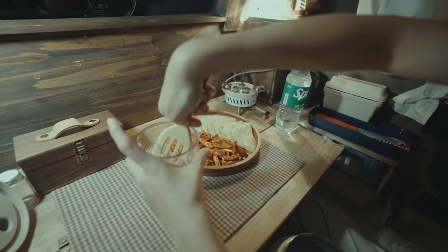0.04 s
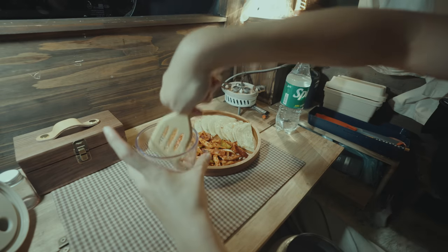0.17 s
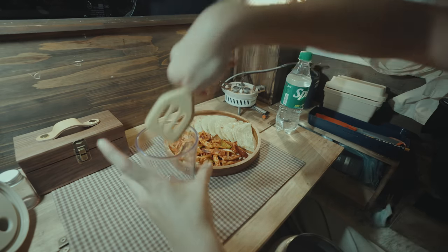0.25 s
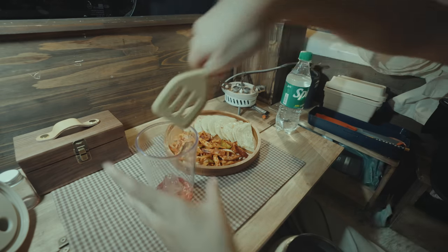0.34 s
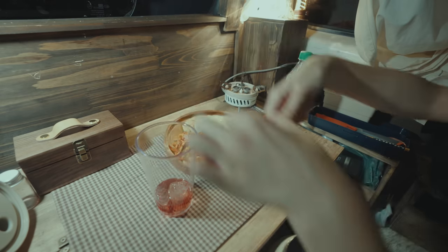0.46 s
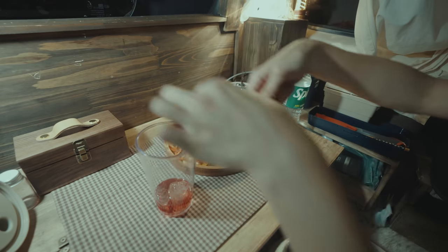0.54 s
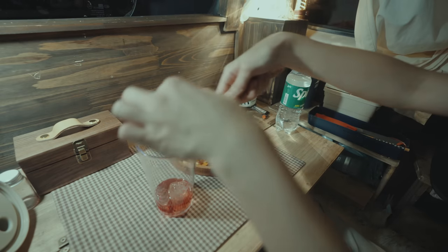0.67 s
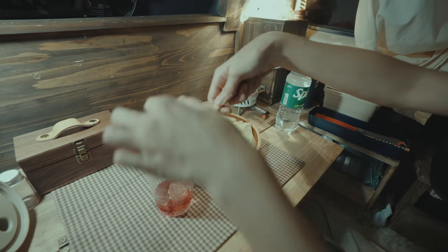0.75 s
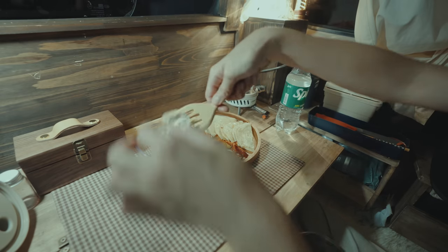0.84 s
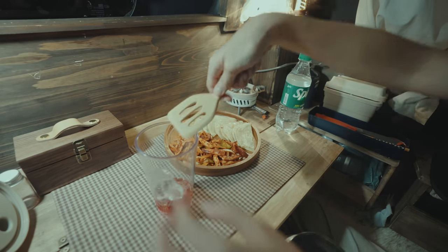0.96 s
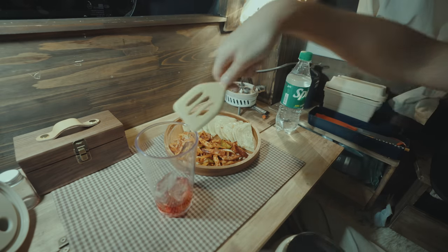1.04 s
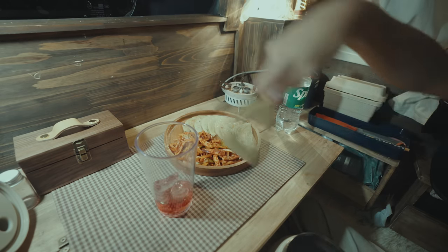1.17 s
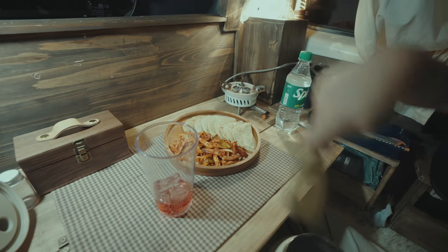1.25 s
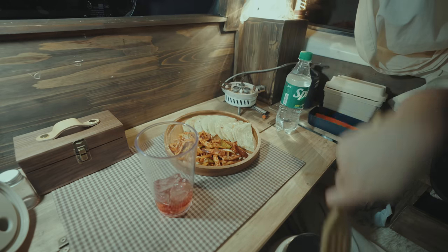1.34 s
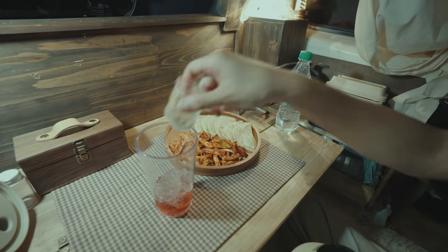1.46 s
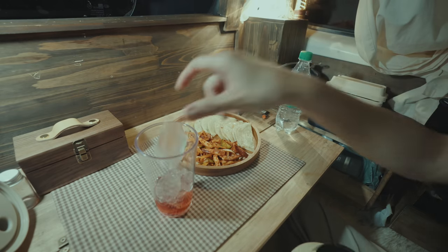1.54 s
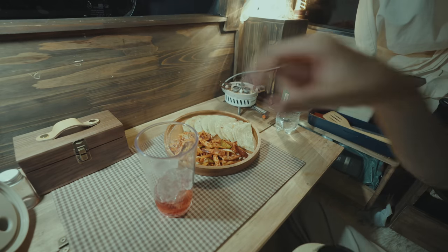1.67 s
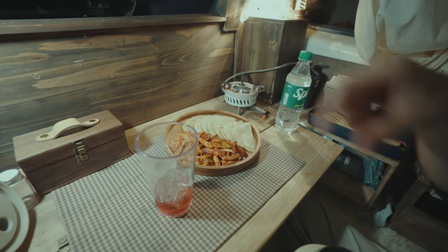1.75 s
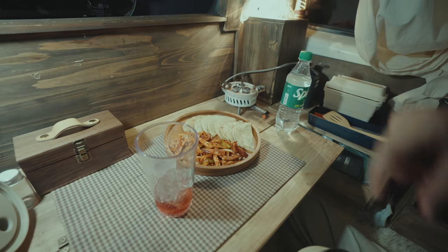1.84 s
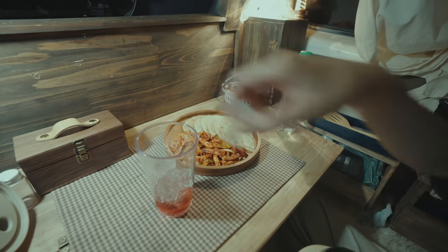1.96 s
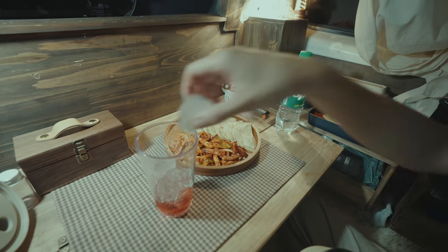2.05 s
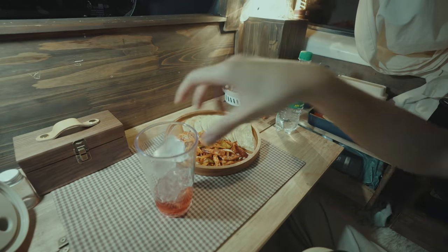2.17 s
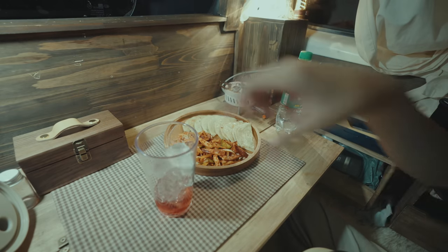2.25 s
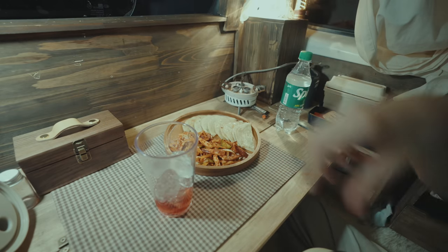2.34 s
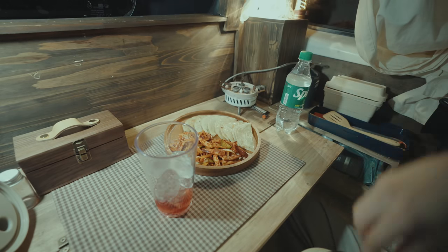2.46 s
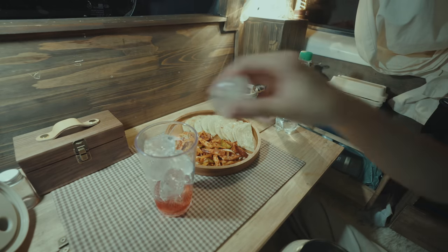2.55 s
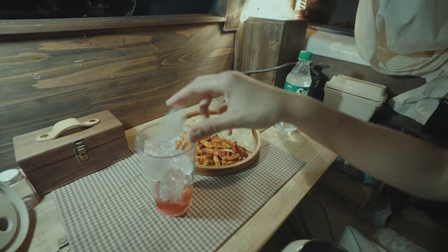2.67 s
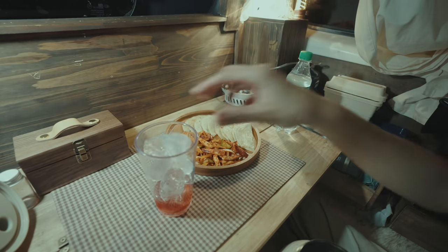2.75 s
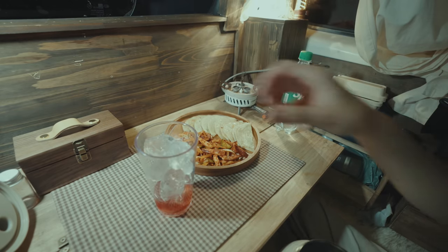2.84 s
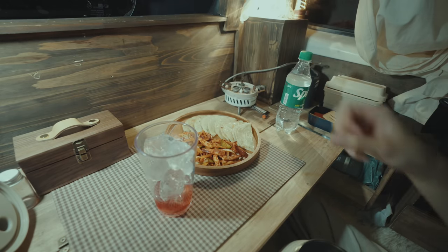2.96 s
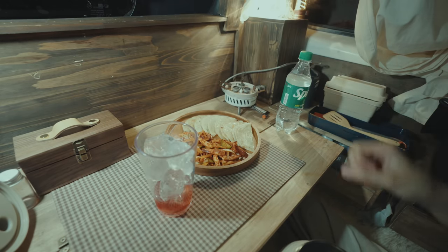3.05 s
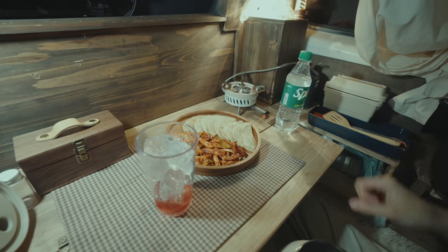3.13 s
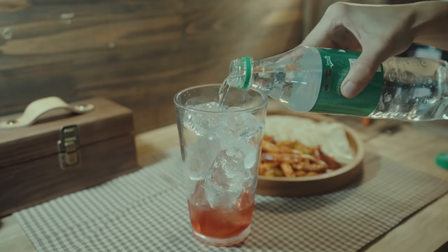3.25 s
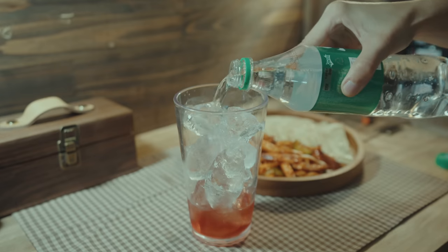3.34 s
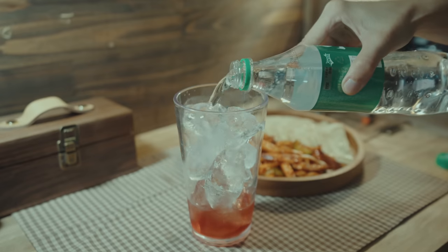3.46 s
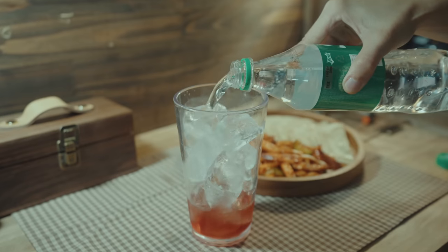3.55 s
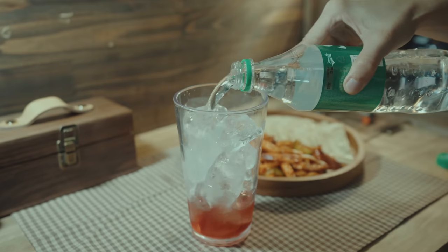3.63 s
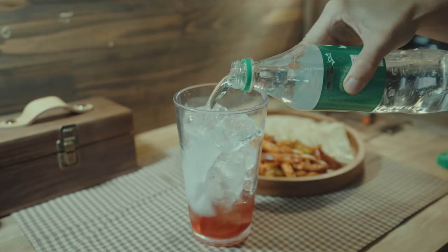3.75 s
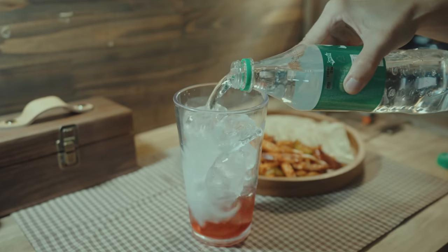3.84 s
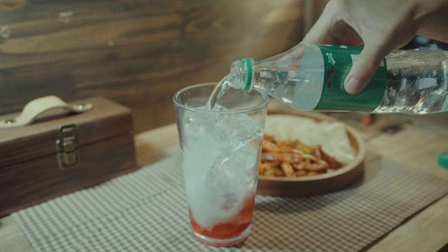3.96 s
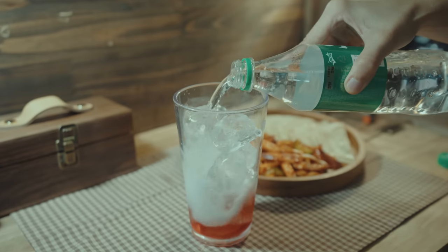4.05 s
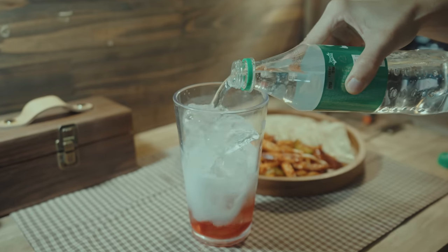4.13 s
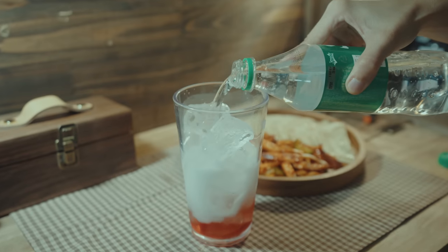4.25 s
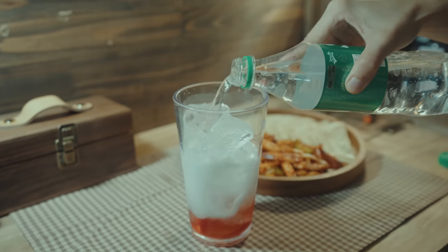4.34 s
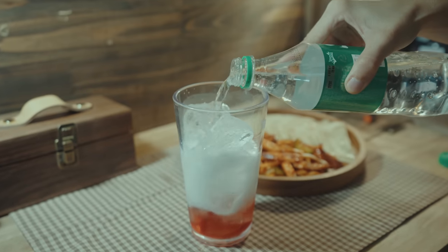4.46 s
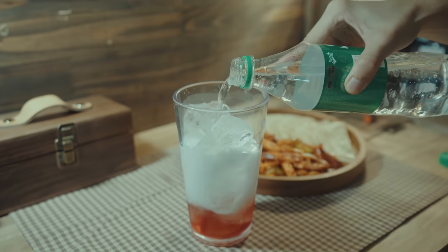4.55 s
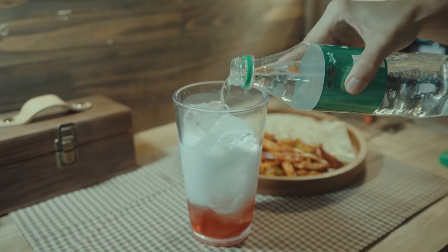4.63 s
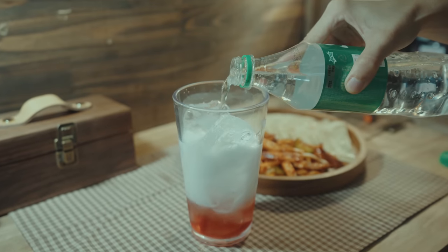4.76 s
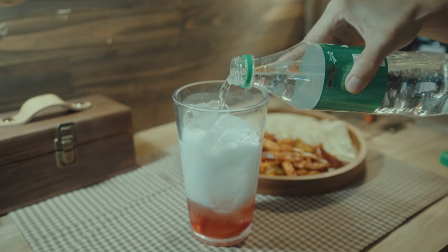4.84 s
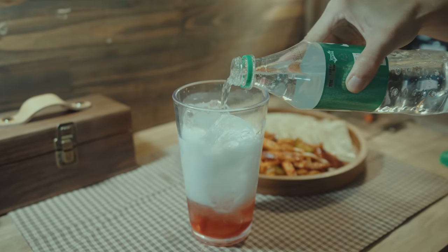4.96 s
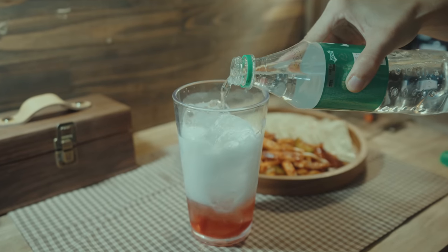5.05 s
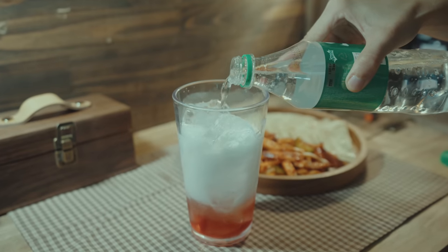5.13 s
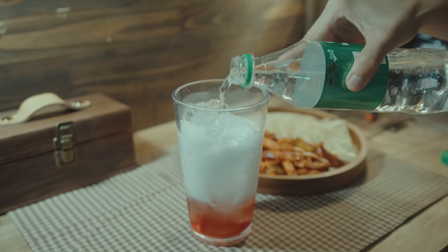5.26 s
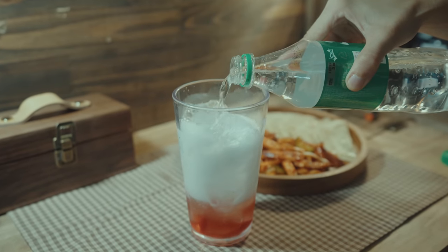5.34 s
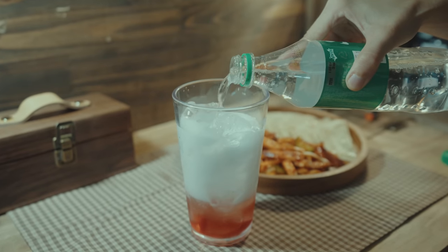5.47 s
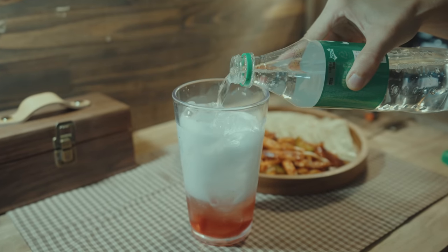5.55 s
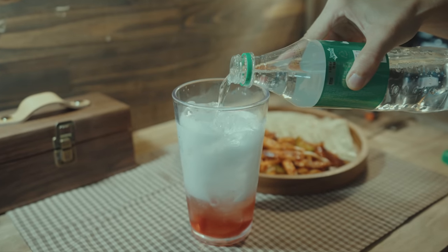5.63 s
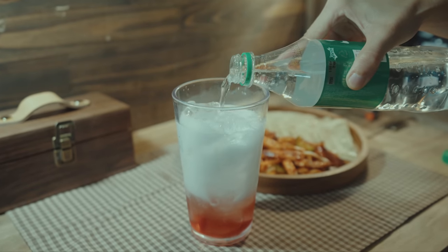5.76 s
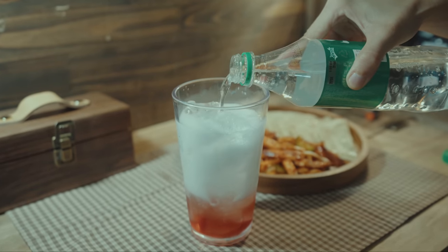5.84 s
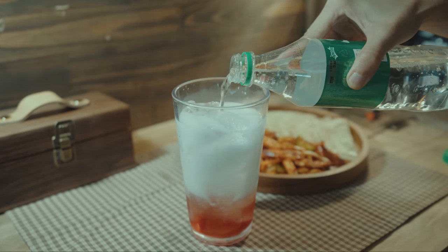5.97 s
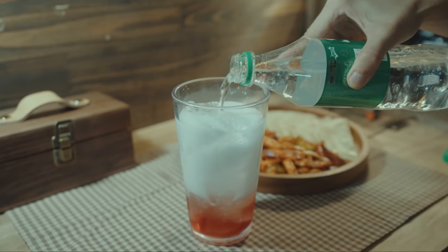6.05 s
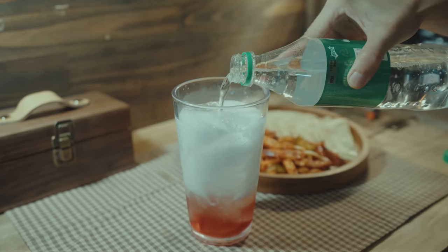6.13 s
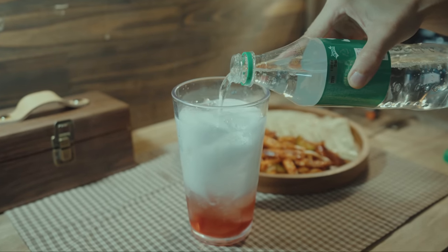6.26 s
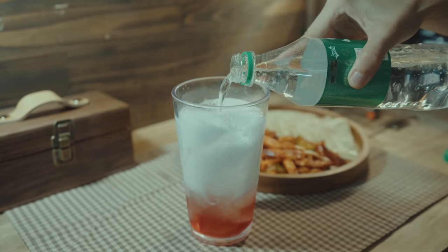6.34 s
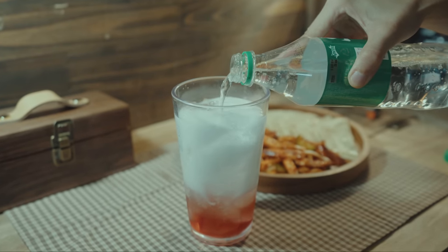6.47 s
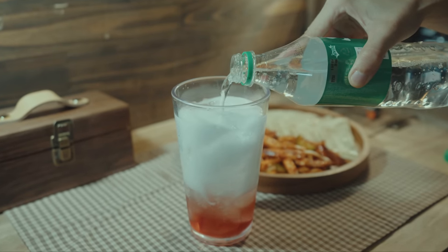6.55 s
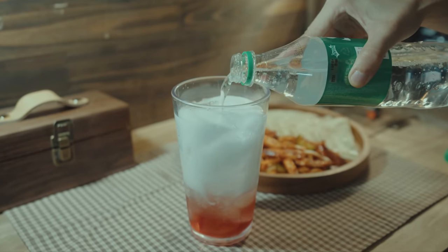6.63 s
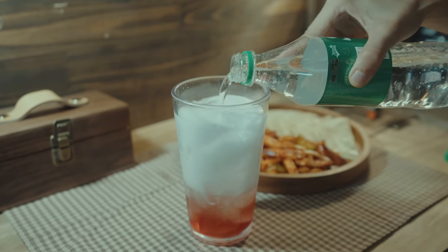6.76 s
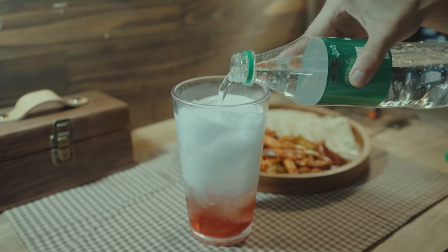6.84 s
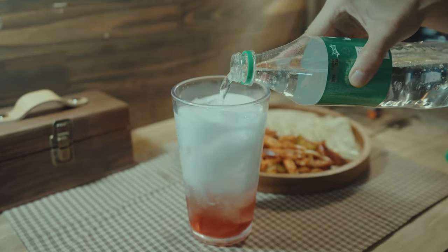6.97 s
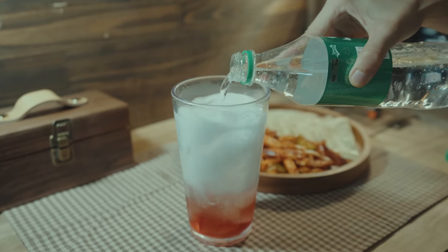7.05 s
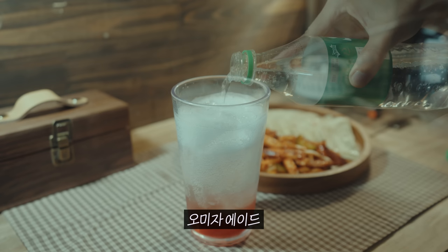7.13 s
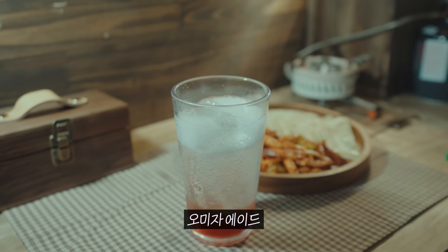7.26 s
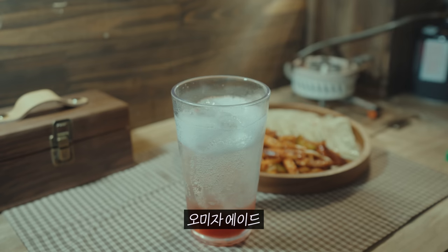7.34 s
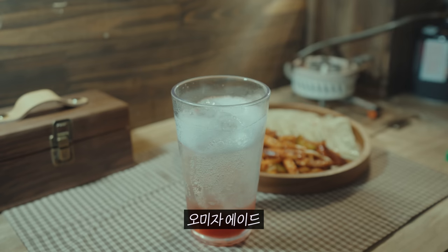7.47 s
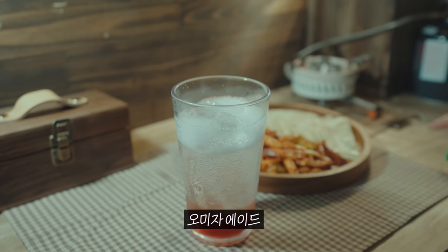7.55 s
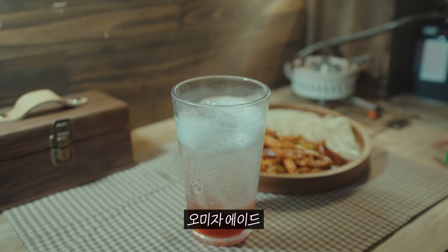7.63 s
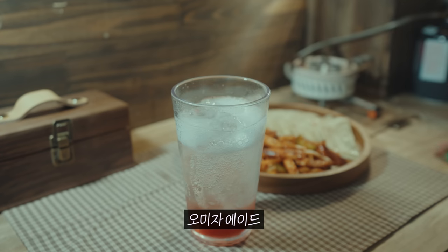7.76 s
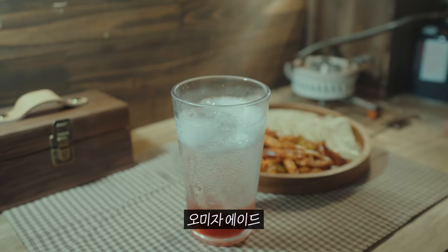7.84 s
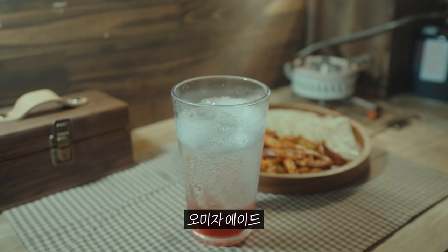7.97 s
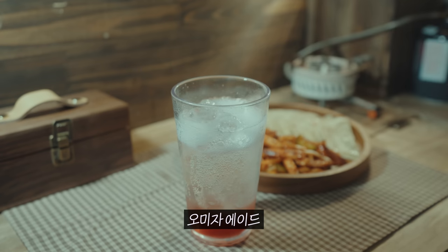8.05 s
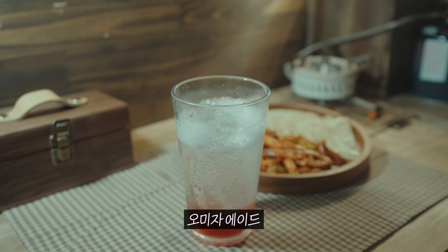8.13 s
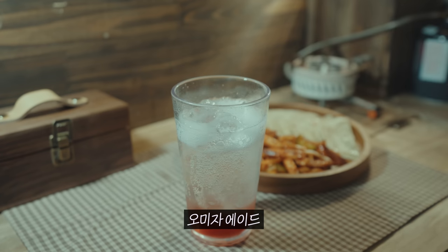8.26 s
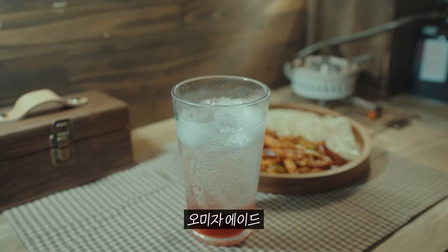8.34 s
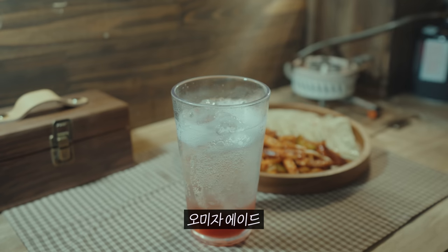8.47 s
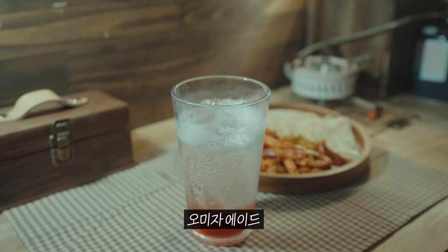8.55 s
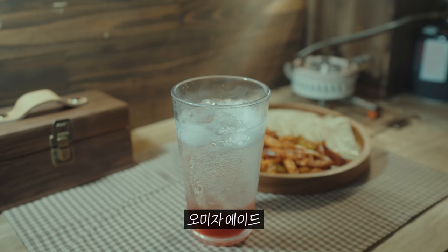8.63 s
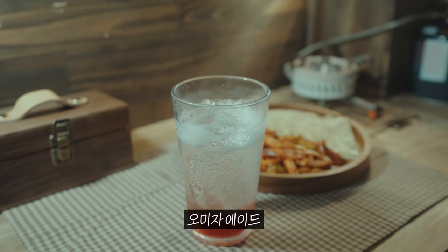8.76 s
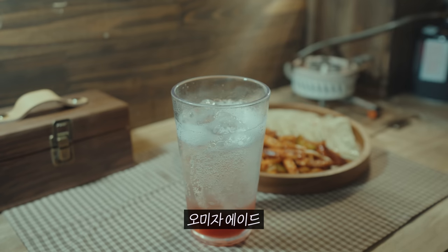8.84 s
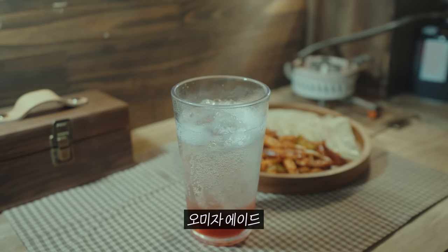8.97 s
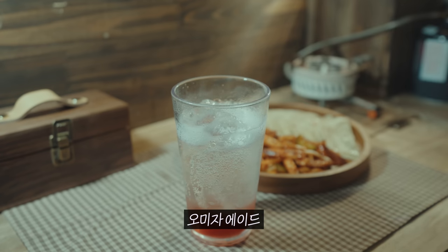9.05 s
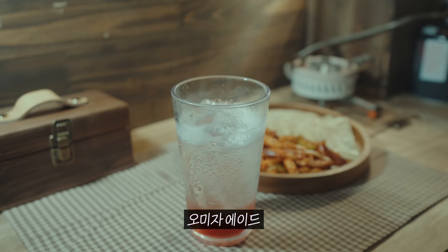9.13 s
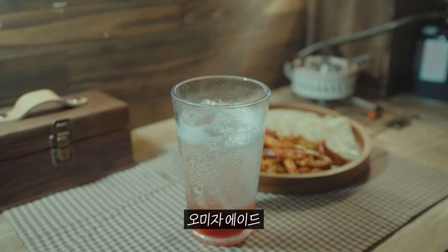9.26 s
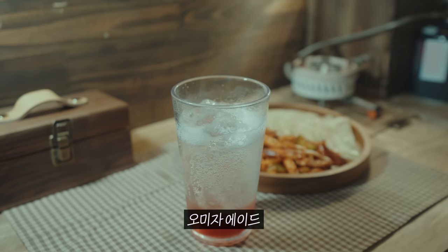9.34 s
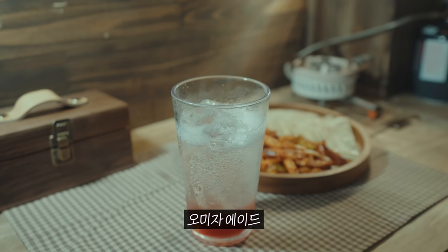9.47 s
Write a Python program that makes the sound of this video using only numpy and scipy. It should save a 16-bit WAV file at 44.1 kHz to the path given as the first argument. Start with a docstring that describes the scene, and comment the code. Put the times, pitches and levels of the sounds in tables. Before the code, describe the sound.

Ice cubes clatter into a glass one by one, then poured soda fizzes steadily while the wet ice cracks and knocks.

```python
"""Ice cubes drop one by one into a tall glass on a wooden table, close to a hissy microphone.
Each cube rattles down the pile, rings the glass and thumps the table. Then soda is poured over
the ice: the pile slumps and cracks, and tiny bursting bubbles make the foam fizz. At the end
the fizz is heard from much closer, and pockets of gas gulp out from under the ice."""
import sys
import numpy as np
from scipy import signal
from scipy.fft import rfft, irfft
from scipy.io import wavfile
from scipy.ndimage import uniform_filter1d

SR = 44100
rng = np.random.default_rng(int(sys.argv[2]) if len(sys.argv) > 2 else 0)


def wrap_up_sound(samples):
    """Save the sound to the file named by the first command line argument, as 16-bit audio."""
    columns = np.atleast_2d(samples).T
    # keep every value between -1 and 1, then stretch to whole-number steps
    tamed = np.clip(columns, -1, 1)
    steps = np.round(tamed * 32767).astype(np.int16)
    wavfile.write(sys.argv[1], SR, steps)


N = 418950
TIME = np.arange(N) / SR
RING_TIME = np.arange(20000) / SR  # seconds since a hit

# Tone colours say how strong a noise is at each pitch.
# low rumble of the room: pitch_hz, level_db
ROOM_COLOUR = [(15, -88), (40, -81), (70, -75.5), (140, -82.5), (300, -90.5), (700, -99.5), (1500, -105),
               (3000, -114), (4200, -107), (5600, -120), (16000, -130)]
# thin hiss of the microphone: pitch_hz, level_db
HISS_COLOUR = [(20, -140), (6800, -124), (7900, -102), (8700, -104), (9300, -121), (10800, -119),
               (12500, -92), (13600, -94.5), (14600, -81), (15600, -77), (16000, -68.5)]
# cube hitting cube: pitch_hz, level_db
CLACK_COLOUR = [(100, -25), (450, 2), (900, -20.5), (1500, -9.5), (2300, -4), (3500, -8), (5000, -12),
                (7000, -23.5), (16000, -38.5)]
# bright tick of a splinter or bubble: pitch_hz, level_db
TICK_COLOUR = [(500, -25.5), (3500, -18.5), (5500, 2), (7000, 0.5), (10000, -8), (13000, -4.5),
               (15500, -7.5)]
# dry cube hitting the glass wall: pitch_hz, level_db
CLUNK_COLOUR = [(60, -20.5), (370, -15), (490, -12.5), (740, 5), (930, -7.5), (1120, 2.5), (1600, -11.5),
                (3000, -25.5), (16000, -68.5)]
# bursting foam: pitch_hz, level_db
FOAM_COLOUR = [(100, -43), (400, -2.5), (750, -17), (1150, -1.5), (2500, -9), (3600, -4), (5200, -5.5),
               (7700, -2), (9800, -4.5), (12700, 0.5), (13500, -26.5), (15600, 3)]
# ice cracking under liquid: pitch_hz, level_db
SNAP_COLOUR = [(100, 2.5), (600, -27), (1600, 0), (2100, -1), (2350, 4), (2800, 4.5), (4400, 0),
               (5800, -15.5), (16000, -19)]
# dull knock under liquid, before its pitch is shifted: pitch_hz, level_db
DULL_COLOUR = [(60, -16), (250, -9), (480, 0), (760, -2), (930, -9.5), (1100, -3), (1600, -7),
               (3000, -27.5), (16000, -42)]
# pitches boosted by the air above the foam: pitch_hz, width_hz, boost_db
AIR_PEAKS = [(1670, 420, 9.5), (2086, 160, 11.5), (2825, 1260, 9.5), (4347, 860, 9.5)]

# A fade_s is the time a sound takes to die away by 60 dB.
# notes of the empty glass: pitch_hz, level_db, fade_s
GLASS_NOTES = [(690, -6, .09), (735, -5, .09), (785, -7, .12), (1114, -6, .26), (1420, -13, .14),
               (1950, -7, .1), (2180, -6, .11), (2480, -6, .11), (3010, -15, .11), (3340, -14, .1),
               (4130, -15, .11), (4650, -18, .09), (6550, -18, .08)]
# notes of the table top: pitch_hz, level_db, fade_s
TABLE_NOTES = [(98, -13, 0.65), (145.7, 0.5, .12), (222.2, 2, 0.13), (250.8, -9, 0.035)]
# sway of the whole table: pitch_hz, level_db, fade_s
SWAY_NOTES = [(60.7, -7, .33)]

# hits of dry ice (a hard corner splinters more than a flat face): start_s, level_db, hardness_db
KNOCKS = [(0.026, -14.5, -11), (0.0367, -11.5, 2), (0.101, -16, -1), (0.1085, -21, 4), (0.13, -16.5, -1.5),
          (0.1664, -22, -9), (0.178, -28, 7), (0.3039, -37.5, -6), (0.399, -36.5, -4), (0.9365, -20, 8.5),
          (0.978, -16, 8.5), (0.997, -11, 3), (1.0129, -14, 1.5), (1.0241, -12, -6), (1.075, -18, -12),
          (1.0887, -21, -22.5), (1.1202, -13, -3.5), (1.1601, -26.5, -10.5), (1.2193, -25, -4.5),
          (1.2436, -28, -2), (1.6016, -13, 4.5), (1.6127, -14, -13), (1.635, -13, -2), (1.6402, -13.5, 6),
          (1.6503, -24, 9), (1.6673, -20, 4), (1.687, -16, -1), (1.7454, -30.5, -7), (1.8278, -36, -11),
          (2.1871, -11, -1.5), (2.2137, -11, 2.5), (2.262, -25.5, 1), (2.293, -20, -3),
          (2.3076, -19.5, 5.5), (2.3251, -18.5, -1), (2.354, -17, -8), (2.3621, -20.5, 4),
          (2.3899, -16.5, -4), (2.6012, -44, 12.5), (2.7372, -11, -1.5), (2.777, -29, 1), (2.8229, -13, 3),
          (2.8322, -15, -3), (2.8999, -24, 4.5)]
# a cube's full weight jolts the table: start_s, level_db
LANDINGS = [(0.0257, -24.5), (1.0023, -39), (1.6017, -13.5), (2.1868, -24.5), (2.3239, -20.5),
            (2.7374, -22.5), (2.7794, -21)]
# a clean bounce lets one note of the cube or glass sing: start_s, level_db, pitch_hz
CLINKS = [(.028, -16, 2555), (.036, -19.5, 1610), (.072, -18.5, 1690), (.996, -19, 752), (1.025, -22, 4220),
          (1.12, -19.5, 2443), (1.613, -21, 3320), (1.634, -23, 825), (2.187, -17, 1920),
          (2.263, -26, 2170), (2.354, -17, 800), (2.777, -30, 720), (3.59, -23.5, 2060),
          (4.283, -31.5, 2080)]
# a cube catches the rim of the nearly empty glass: start_s, level_db, pitch_hz
RIM_TAPS = [(0, -32.5, 1246), (0.105, -20.5, 1137), (.938, -31, 1127), (.98, -28, 1115)]
# cubes grind down the pile: start_s, end_s, level_db
SCRAPES = [(0.117, 0.203, -34), (1.033, 1.24, -35.5), (1.64, 1.753, -36.5), (2.26, 2.434, -34)]
# wet ice slips and cracks: start_s, level_db
CRACKS = [(3.51, -34), (3.5238, -23.5), (3.5711, -17.5), (3.5851, -13), (3.599, -16.5), (3.609, -21),
          (3.6809, -27.5), (3.7215, -35), (3.7582, -39.5), (3.91, -44), (4.042, -28.5), (4.083, -34.5),
          (4.105, -36), (4.131, -29.5), (4.147, -35), (4.1631, -26), (4.179, -30.5), (4.2557, -32.5),
          (4.271, -33), (4.2815, -20.5), (5.3597, -36), (5.433, -32), (5.4569, -33.5), (6.17, -44.5),
          (6.62, -46), (8.2756, -21), (8.361, -20), (8.405, -18), (8.44, -24), (8.4729, -15),
          (8.5107, -15.5), (8.6225, -19.5), (8.6414, -16), (9.215, -20.5), (9.4042, -23), (9.4637, -20)]
# big pockets of gas escape: start_s, level_db, pitch_hz
GULPS = [(7.318, -44.5, 362), (8.16, -38.5, 332), (8.194, -36.5, 324), (8.272, -35, 339), (8.625, -27, 375),
         (9.209, -32.5, 362)]

# how full of ice the glass is: time_s, fill_0_to_1
ICE_FILL = [(0, 0), (1.1, 0.15), (1.7, 0.68), (2.3, 0.96), (2.8, 1)]
# the drink covers the ice, the pile lifts a little and at last floats: time_s, depth_0_to_1
ICE_DEPTH = [(3.5, 0.23), (4.1, 0.96), (4.3, 0.64), (5.3, .8), (7.15, .8), (7.25, 0)]
# the hiss grows as we listen from closer: time_s, boost_db
CLOSENESS = [(3.19, 0), (3.21, 1), (7.15, 2.5), (7.25, 12.5), (9.5, 11.5)]

BUZZ_HZ, BUZZ_END_S = 156.8, 3.2
POUR_S, BIG_BUBBLE_S = 3.286, 7.322
TREBLE_LIMIT_HZ = 15850


def amp(db):
    """Turns decibels into a number to multiply a sound by."""
    return 10 ** (np.asarray(db) / 20)


def unit(x):
    """Scales a sound to an average (rms) level of 1."""
    return x / np.sqrt(np.mean(x ** 2) + 1e-20)


def value_at(time_s, rows):
    """Reads a table over time, joining its rows with straight lines."""
    return np.interp(time_s, *np.transpose(rows))


def add(mix, start_s, sound):
    """Lays a sound into the mix."""
    part = mix[max(round(start_s * SR), 0):][:len(sound)]
    part += sound[:len(part)]


def colour(x, points, peaks=()):
    """Gives a sound a tone colour, plus any boosted peaks."""
    hz = np.fft.rfftfreq(len(x), 1 / SR)
    point_hz, point_db = np.transpose(points)
    base_db = np.interp(np.log(hz + 1), np.log(point_hz), point_db)
    peak_db = sum(boost * np.exp(-(2 * (hz - pitch) / width) ** 2) for pitch, width, boost in peaks)
    return irfft(rfft(x) * amp(base_db + peak_db), len(x))


def pops(per_s, spread_db):
    """Clicks at random times and of random sizes."""
    chance, sign = rng.random((2, N))
    size = amp(spread_db * np.minimum(rng.exponential(1, N), 5))
    return (chance < per_s / SR) * np.sign(sign - .5) * size


def wall_echoes(x, echo_db, fade_s):
    """Quick echoes from close walls thicken clicks and tint steady sounds."""
    t = RING_TIME[:4096]
    tail = rng.standard_normal(len(t)) * amp(-60 * t / fade_s) * (t > .002)
    echoes = signal.oaconvolve(x, tail / np.linalg.norm(tail))[:N]
    return (x + amp(echo_db) * echoes) / np.hypot(1, amp(echo_db))


def rumble_and_hiss():
    """Low room rumble and a very high hiss; both grow as we listen from closer."""
    rumble, hiss = rng.standard_normal((2, N)) * np.sqrt(SR / 2)
    near_db = value_at(TIME, CLOSENESS)
    # before the pour the hiss pulses: an electrical buzz, as from a dimmed lamp
    pulses = unit(np.exp(0.97 * np.cos(2 * np.pi * BUZZ_HZ * TIME)))
    hiss *= np.where(TIME < BUZZ_END_S, pulses, 1)
    return colour(rumble, ROOM_COLOUR) * amp(0.33 * near_db) + colour(hiss, HISS_COLOUR) * amp(near_db)


def ring(notes, spread_db=0, detune=0, damping=1):
    """A struck object rings with fading notes; each blow shares its strength out differently."""
    hz, db, fade_s = np.transpose(notes)[:, :, None]
    strength, shift = rng.standard_normal((2, len(notes), 1))
    waves = np.sin(2 * np.pi * hz * (1 + detune * shift) * RING_TIME)
    onset = 1 - np.exp(-2 * hz * RING_TIME)
    level = amp(db + spread_db * strength - 60 * damping * RING_TIME / fade_s)
    return (waves * onset * level).sum(0)


def hit(points, fade_s, echo_db, echo_s, hold_s, ripple_db, size=8192):
    """One hit: a short burst of noise, then the small room's echo fading over echo_s."""
    t = RING_TIME[:size]
    noise, ripple = rng.standard_normal((2, size))
    # random bumps in the tone give each hit its own colour
    ripple = uniform_filter1d(uniform_filter1d(ripple, size=30), size=18)
    ripple = np.clip(unit(ripple)[:size // 2 + 1], -2, 2)
    noise = irfft(rfft(colour(noise, points)) * amp(ripple_db * ripple))
    shape = amp(-60 * np.maximum(t - hold_s, 0) / fade_s) + amp(echo_db - 60 * t / echo_s)
    strength = np.sqrt(np.sum((noise * shape) ** 2) / np.sum(shape ** 2))
    onset = 1 - np.exp(-t / 0.0013)
    return noise / strength * shape * onset


def dropped_ice():
    """Every knock clacks, rings the glass and thumps the table; piled ice shortens the ring."""
    out = np.zeros(N)
    for start_s, db, hardness_db in KNOCKS:
        fill = value_at(start_s, ICE_FILL)
        push_db = db - 0.22 * hardness_db  # a hard corner glances off and pushes less
        clack = hit(CLACK_COLOUR, fade_s=.06, echo_db=-10, echo_s=.13, hold_s=.00077, ripple_db=5.5)
        tick = hit(TICK_COLOUR, fade_s=.024, echo_db=-28, echo_s=.28, hold_s=.0017, ripple_db=5.5)
        clunk = hit(CLUNK_COLOUR, fade_s=.051, echo_db=-7.5, echo_s=.18, hold_s=.00074, ripple_db=-1)
        glass = ring(GLASS_NOTES, spread_db=4.5, detune=.006, damping=1 + 1.1 * fill)
        add(out, start_s, amp(db - 10) * clack)
        add(out, start_s, amp(db + hardness_db - 12) * tick)
        add(out, start_s, amp(push_db - 17.5) * clunk)
        add(out, start_s, amp(push_db - 11 - 2 * fill) * glass)
        add(out, start_s, table_thump(push_db - 13.5, fill))
    for start_s, db in LANDINGS:
        add(out, start_s, table_thump(db, value_at(start_s, ICE_FILL)))
    for taps, fade_s in (CLINKS, .11), (RIM_TAPS, .28):
        for start_s, db, hz in taps:
            add(out, start_s, ring([(hz, db, fade_s)]))
    return out


def table_thump(db, fill):
    """The table takes the blow; the fuller the glass, the more the whole table sways."""
    top = ring(TABLE_NOTES, spread_db=2.5, detune=0.045) * amp(-1 - 2 * fill)
    sway = ring(SWAY_NOTES, detune=0.071) * amp(-8 + 9.2 * fill)
    return amp(db) * (top + sway)


def grinding_ice():
    """A sliding cube sticks and slips; each slip is a tiny clack that sets the cube ringing."""
    out = np.zeros(N)
    slips = pops(per_s=330, spread_db=2)
    cube = ring([(2110, 0, .045), (2800, -1.5, .028), (3350, -4.5, .092)])  # pitch_hz, level_db, fade_s
    clacks = unit(colour(slips, CLACK_COLOUR))
    ringing = unit(signal.oaconvolve(slips, cube)[:N])
    grinding = wall_echoes(clacks + amp(-5) * ringing, echo_db=8, fade_s=.025)
    for start_s, end_s, db in SCRAPES:
        scrape = grinding[round(start_s * SR):round(end_s * SR)]
        add(out, start_s, amp(db) * unit(scrape) * signal.windows.tukey(len(scrape), .6))
    return out


def pour_ramp(rise_s):
    """Grows from 0 to 1 once the soda flows."""
    return np.clip((TIME - POUR_S) / rise_s, 0, 1)


def bubble(hz, fade_s, glide):
    """A pocket of gas rings and slides in pitch as it dies away."""
    t = RING_TIME[:4000]
    pitch_hz = hz * (1 + glide * np.minimum(t / fade_s, 1))
    wave = np.sin(2 * np.pi * np.cumsum(pitch_hz) / SR)
    return wave * amp(-60 * t / fade_s) * (1 - np.exp(-t * hz * 2))


def soda_stream(rise_s=0.24, hold_s=0.34, fade_db_per_s=24):
    """The pour makes tiny cracks in the ice and traps small bubbles, until foam covers the cubes."""
    bubbles = np.zeros(N)
    for hz in np.geomspace(650, 2400, num=16):
        starts = pops(per_s=40, spread_db=4.5)
        bubbles += signal.oaconvolve(starts, bubble(hz, fade_s=16 / hz, glide=.08))[:N]
    cracks = unit(colour(pops(per_s=120, spread_db=5), SNAP_COLOUR))
    splinters = unit(colour(pops(per_s=58, spread_db=5), TICK_COLOUR))
    covered_s = np.maximum(TIME - POUR_S - rise_s - hold_s, 0)
    level = pour_ramp(rise_s) ** 2 * amp(-54.5 - fade_db_per_s * covered_s)
    return unit(unit(bubbles) + amp(-5.5) * cracks + amp(1) * splinters) * level


def fizz():
    """Thousands of tiny bubbles burst each second in the glass; single ones prickle above them."""
    foam = unit(colour(pops(per_s=9000, spread_db=2.5), FOAM_COLOUR, AIR_PEAKS))
    prickle = unit(colour(pops(per_s=180, spread_db=-1), TICK_COLOUR))
    level = pour_ramp(rise_s=0.94) * amp(-50 + 0.81 * value_at(TIME, CLOSENESS))
    return (foam + amp(-20.5) * prickle) * level


def wet_ice():
    """Under liquid the ice creaks, then snaps and knocks with hardly any ring; deeper is duller."""
    out = np.zeros(N)
    for start_s, db in CRACKS:
        depth = value_at(start_s, ICE_DEPTH)
        pressing = np.sqrt(depth)  # floating ice hardly pushes on the glass or table
        soaked_s = start_s - POUR_S
        pitch_factor = max(1.404 - 0.25 * soaked_s, 0.84)  # the knock sinks as the glass fills
        knock_colour = [(hz * pitch_factor, level) for hz, level in DULL_COLOUR]
        snap = hit(SNAP_COLOUR, fade_s=.035, echo_db=-5.5, echo_s=.077, hold_s=.0011, ripple_db=2.5)
        tick = hit(TICK_COLOUR, fade_s=.04, echo_db=-18, echo_s=.09, hold_s=.002, ripple_db=2.5)
        knock = hit(knock_colour, fade_s=.036, echo_db=-8, echo_s=.15, hold_s=.0042, ripple_db=2.2)
        snap *= amp(db - 9 - 21.5 * depth)
        add(out, start_s - .007, amp(-17) * snap)  # the creak
        add(out, start_s, snap)
        add(out, start_s, amp(db - 23 - 0.5 * soaked_s) * tick)  # soaked ice splinters less
        add(out, start_s, amp(db - 18 + 13.5 * pressing) * knock)
        add(out, start_s, table_thump(db - 28 + 20.5 * pressing, fill=1.33))  # the drink adds weight
    return out


def gulps():
    """Gas slips out from under the ice in low blubs, and one big bubble bursts with a tick."""
    out = np.zeros(N)
    tick = hit(TICK_COLOUR, fade_s=.025, echo_db=-20, echo_s=.07, hold_s=.002, ripple_db=1.2)
    add(out, BIG_BUBBLE_S, amp(-28) * tick)
    for start_s, db, hz in GULPS:
        add(out, start_s, amp(db + 5.5) * bubble(hz, fade_s=0.071, glide=-0.092))
    return out


def scene():
    """All the sounds meet at one microphone."""
    steady = wall_echoes(soda_stream() + fizz() + rumble_and_hiss(), echo_db=-9, fade_s=0.045)
    return (dropped_ice() + grinding_ice() + wet_ice() + gulps() + steady)[None]


def record(dry):
    """Cuts off the very highest treble."""
    lowpass = signal.firwin(801, TREBLE_LIMIT_HZ, window=("kaiser", 8), fs=SR)
    return signal.oaconvolve(dry, lowpass[None], "same")


dry = scene()
out = record(dry)
wrap_up_sound(out)
```